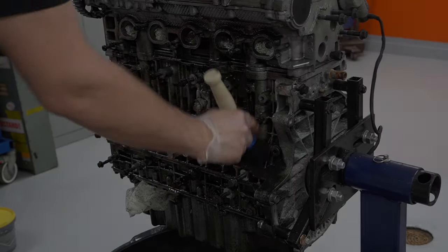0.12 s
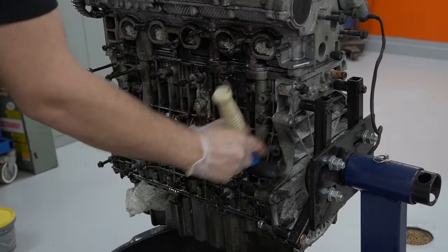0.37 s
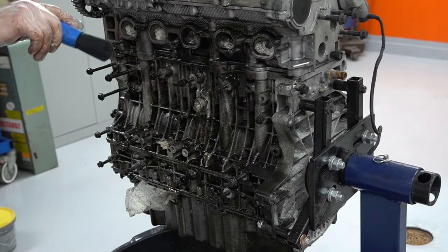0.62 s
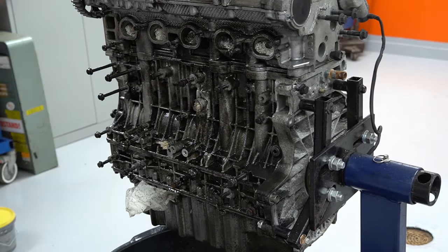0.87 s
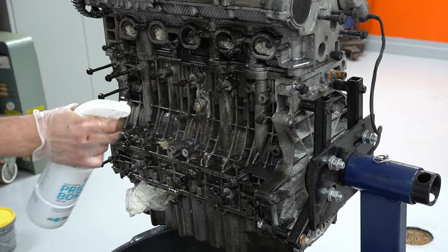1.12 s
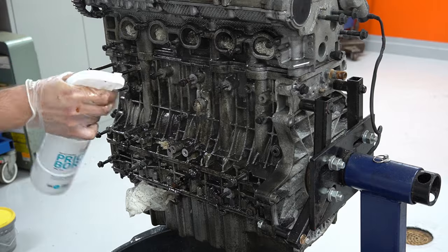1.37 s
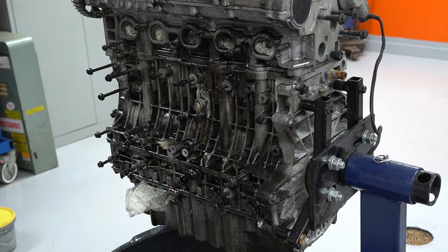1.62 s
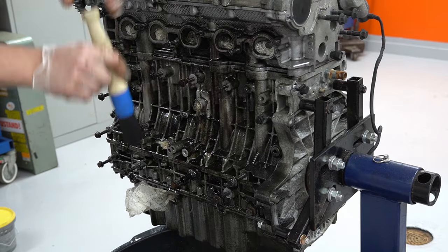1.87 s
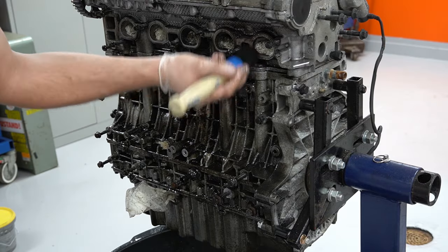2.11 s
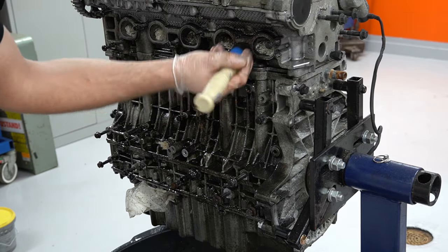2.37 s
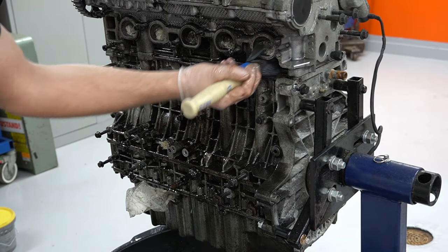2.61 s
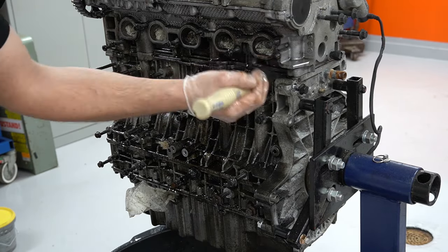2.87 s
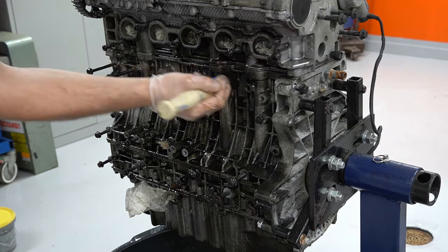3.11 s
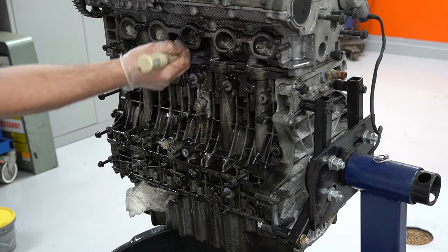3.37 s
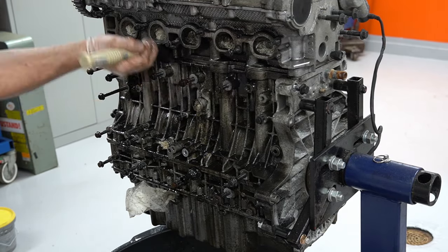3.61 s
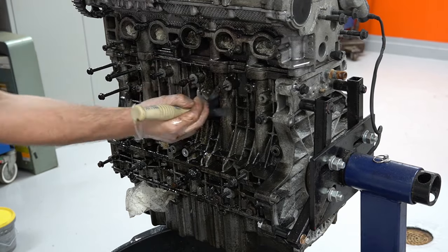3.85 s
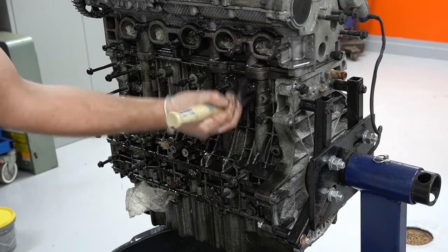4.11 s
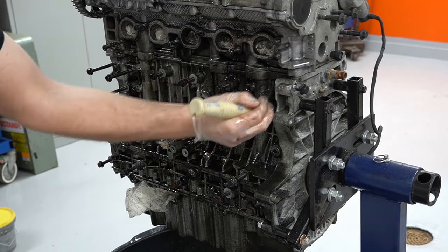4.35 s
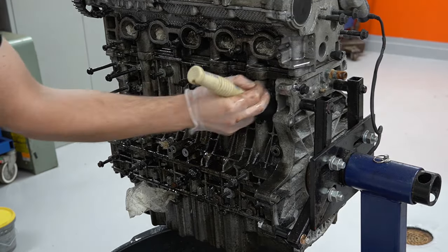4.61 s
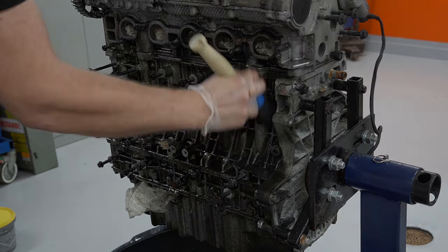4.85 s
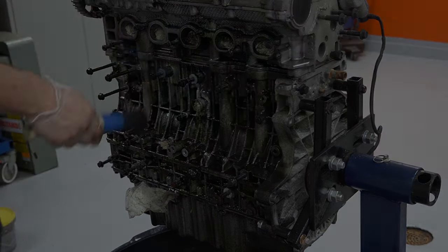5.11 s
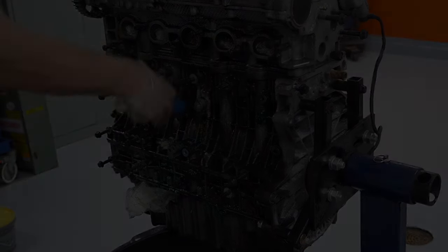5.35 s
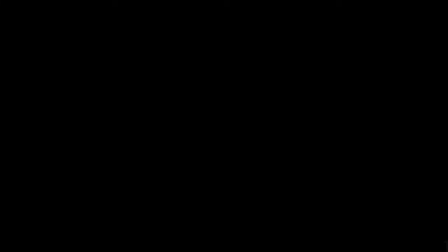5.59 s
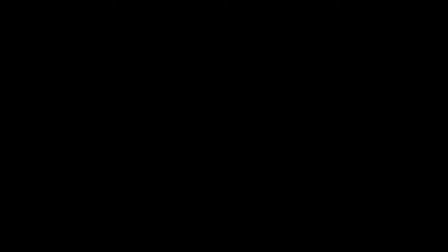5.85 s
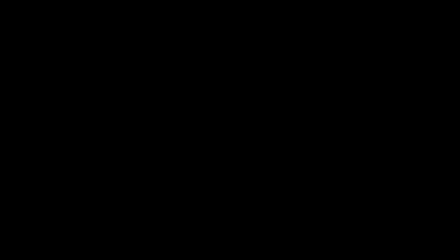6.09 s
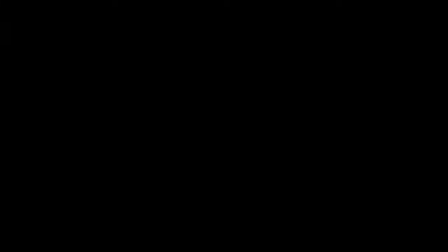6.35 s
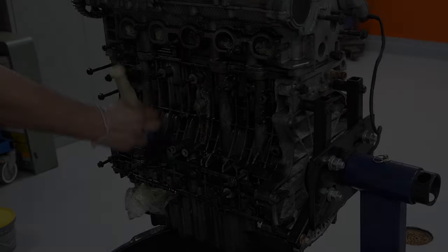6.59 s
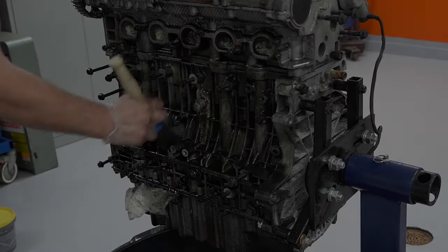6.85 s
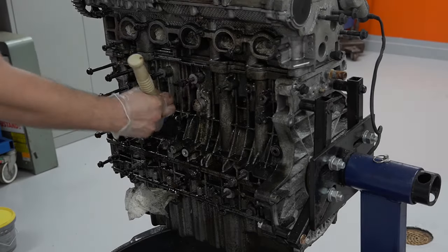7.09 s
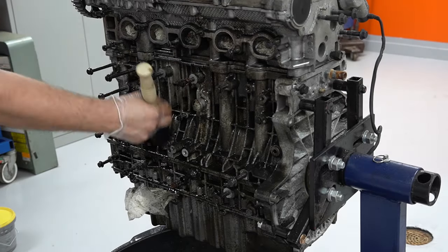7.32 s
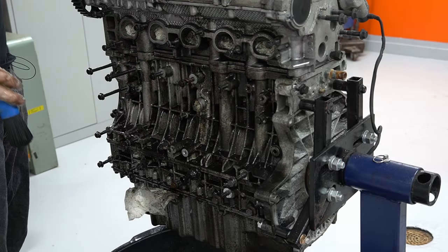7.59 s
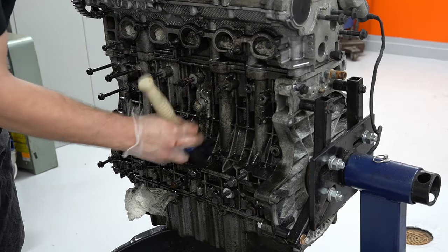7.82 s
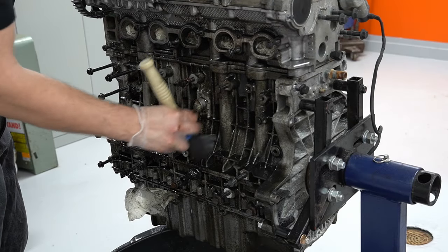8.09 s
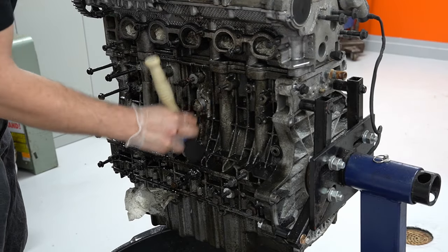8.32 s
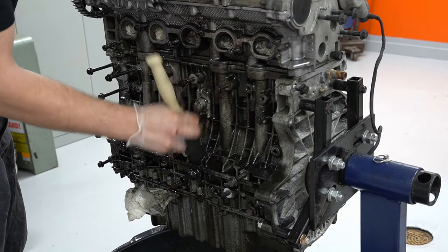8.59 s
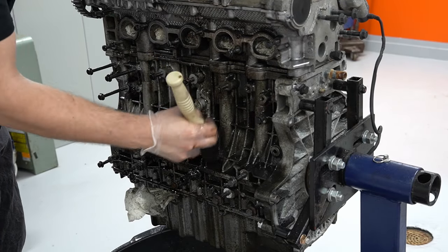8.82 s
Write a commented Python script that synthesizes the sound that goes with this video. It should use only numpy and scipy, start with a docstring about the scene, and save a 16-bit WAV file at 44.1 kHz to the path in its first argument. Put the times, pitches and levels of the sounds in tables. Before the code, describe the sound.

Close, dry scrubbing of bristles on cast metal, each stroke so quick that the bursts buzz like a rapid flutter. After a short opening bout comes a quiet pause with fast faint sprays and clicking trigger ticks, then long vigorous bouts whose colour shifts between bright hiss and hollow rasp. Small wooden-sounding knocks and soft glove rubs intrude, and deep bumps rumble through the microphone in a small-sounding garage with a faint low floor.

```python
"""A stiff brush scrubs a wet engine block in very quick strokes, heard at high speed: noise of random bristle
flicks on cast ribs (hiss) plus the same noise through a metal pocket (rasp), swelling with each stroke. Low
rumble comes in lumps of filtered noise through the microphone mount, over a faint garage floor. The handle
knocks now and then (decaying modes), glove and bottle rub and the brush scrapes a pocket edge (narrow noise),
and a trigger bottle sprays in a pause (noise jets, ringing ticks); knocks, rubs and bottle echo in the garage."""
import sys
import numpy as np
from scipy import signal
from scipy.io import wavfile
from scipy.ndimage import uniform_filter1d

SR = 44100
rng = np.random.default_rng(int(sys.argv[2]) if len(sys.argv) > 2 else 0)


def int16_out(signal):
    """Quantize to a 16-bit WAV file."""
    q = np.round(np.clip(np.atleast_2d(signal).T, -1, 1) * 32767)
    wavfile.write(sys.argv[1], SR, q.astype(np.int16))


def makeup_ratio(level_db):
    """Linear amplitude ratio for a level in decibels (20 dB per factor of ten)."""
    decades = np.asarray(level_db, float) / 20
    return 10 ** decades


N = 394694


def rms_one(x):
    """Scale to rms 1."""
    return x / np.sqrt(np.mean(x ** 2) + 1e-20)


def in_time(rows):
    """Interpolate the columns of (s, value, ..) rows at every sample."""
    time_s, *columns = np.transpose(rows)
    return [np.interp(np.arange(N) / SR, time_s, column) for column in columns]


def band(x, low_hz, high_hz):
    """Butterworth band-pass."""
    return signal.sosfilt(signal.butter(2, [low_hz, high_hz], "band", fs=SR, output="sos"), x)


def drift(rate_hz):
    """Slow random curve of rms 1: two-pole low-passed noise, drawn every 40 samples."""
    pole = np.exp(-80 * np.pi * rate_hz / SR)
    noise = rng.standard_normal(N // 40 + 2002)
    slow = signal.lfilter([1], [1, -2 * pole, pole * pole], noise)[2000:]   # settled part
    return np.interp(np.arange(N) / 40, np.arange(len(slow)), rms_one(slow))


def swells(middle_s, level_db, half_ms):
    """Power of bell-shaped swells: speed rises and falls within each movement."""
    power = np.zeros(N)
    for s, db, half_s in zip(middle_s, level_db, np.maximum(half_ms, 1) / 1000):
        start = max(round((s - 5 * half_s) * SR), 0)
        stop = min(round((s + 5 * half_s) * SR), N)
        at = np.arange(start, stop)
        late_s = at / SR - s
        width_s = half_s * (1 + 0.11 * np.sign(late_s))   # rise a little quicker than fall
        power[at] += makeup_ratio(2 * db) * np.exp(-0.5 * (late_s / width_s) ** 2)
    return power


def flicks(per_s, spread_db):
    """Random clicks of uneven size and either sign, rms 1."""
    sizes = makeup_ratio(spread_db * np.minimum(rng.exponential(1, N), 5)) * rng.choice([-1, 1], N)
    return rms_one(sizes * (rng.random(N) < per_s / SR))


def bands(spectrum, sources, patchy_db, rate_hz):
    """Centres and signals of third-octave bands; sources alternate, each band flickers on its own."""
    edges = 180 * 2 ** np.arange(0, 6.7, 1 / 3)
    centre_hz = np.sqrt(edges[1:] * edges[:-1])
    table_hz, table_db = np.transpose(spectrum)
    gains = makeup_ratio(np.interp(np.log(centre_hz), np.log(table_hz), table_db))
    parts = []
    for k, gain in enumerate(gains):
        flicker = makeup_ratio(patchy_db * drift(rate_hz))
        parts.append(gain * flicker * band(sources[k % 2], edges[k], edges[k + 1]))
    return centre_hz, np.array(parts)


def ring(clicks, hz, t60_s):
    """Two-pole resonator: a unit click starts a decaying sine of initial height 1."""
    pole, w = makeup_ratio(-60 / (t60_s * SR)), 2 * np.pi * hz / SR
    return signal.lfilter([0, np.sin(w)], [1, -2 * pole * np.cos(w), pole * pole], clicks + 1e-18)


def hand():
    """Scrubbing effort: bouts of strokes over a drag that runs from bout to bout, weaker as the brush lifts."""
    # bouts of evenly spaced strokes: first_middle_s, strokes, strokes_per_s
    bouts = [(0.02, 8, 30.6), (0.286, 6, 27.4), (0.495, 2, 29.1), (0.601, 3, 20.4), (0.864, 1, 30),
             (1.661, 3, 18.1), (1.859, 1, 30.0), (1.886, 2, 34.8), (2.013, 16, 31.0), (2.522, 11, 28.9),
             (2.911, 6, 29.5), (3.144, 5, 26.9), (3.353, 3, 31.8), (3.458, 2, 35.0), (3.526, 6, 28.0),
             (3.786, 4, 26.3), (3.957, 3, 28.9), (4.097, 5, 29.9), (4.295, 11, 29.7), (4.682, 8, 29.5),
             (4.986, 1, 30.0), (5.031, 1, 30.0), (5.126, 1, 30.0), (5.182, 1, 30.0), (5.223, 8, 29.6),
             (5.519, 3, 43.3), (5.621, 4, 28.8), (5.753, 7, 28.7), (5.981, 8, 26.8), (6.303, 2, 27.7),
             (6.393, 3, 29.0), (6.512, 10, 32.1), (6.835, 3, 27.0), (6.959, 10, 30.7), (7.295, 4, 27.7),
             (7.448, 2, 30.4), (7.559, 1, 30.0), (7.697, 2, 20.3), (7.802, 2, 20.1), (7.874, 12, 29.4),
             (8.325, 7, 28.8), (8.638, 5, 31.2), (8.801, 2, 43.8), (8.871, 3, 29.9)]
    # pressure in each bout: hiss_db, drag_over_hiss_db
    pressure = [(-42, -8.5), (-43, -7.5), (-40.5, -17), (-62, -4.0), (-62.5, -5), (-60.5, -6), (-46.5, -15),
                (-53, -5), (-39.0, -10.5), (-40.5, -4.5), (-40, -6.5), (-41.0, -5.5), (-43.5, -1.5),
                (-36, -11), (-41.0, -7), (-38, -8.5), (-47.0, 1), (-36.5, -11), (-39.0, -5.5),
                (-41.5, -5.5), (-40, -5.5), (-51, -10), (-55.5, 1), (-48.5, -6), (-38, -12.5),
                (-44.5, -0.5), (-38, -5.0), (-42.0, -6.0), (-44, -2.5), (-52, -5.5), (-50, -0.5),
                (-44.5, -6), (-41.5, -6.5), (-42.5, -8), (-44, -4), (-55, -6.5), (-50.5, -12), (-56.5, -6),
                (-42.0, -7), (-45.5, -5.5), (-45, 0.0), (-43.0, -4.5), (-44.5, -13), (-42.0, -9.5)]
    # strokes off the beat, or harder or softer than their bout: middle_s, change_db
    accents = [(0.023, 2.5), (0.089, -5.5), (0.125, -5.5), (0.154, -6), (0.322, 5), (0.396, 1.5),
               (0.429, -1.5), (0.53, -3.5), (1.778, -9), (1.989, -8), (2.042, -5.5), (2.107, -5),
               (2.172, -2.5), (2.266, 0.5), (2.339, -7), (2.37, 1.5), (2.405, 0), (2.525, 9.5), (2.556, 2),
               (2.623, 7), (2.66, 5.5), (2.728, -1), (2.797, 3.5), (2.949, -5.5), (3.047, 1), (3.186, -6),
               (3.253, 6), (3.289, 4.5), (3.527, -4), (4.026, 8.0), (4.093, -2.5), (4.128, 3.5),
               (4.403, 0.5), (4.457, 2.5), (4.501, 5), (4.569, 0.5), (4.604, 0), (4.788, -2), (4.892, 1),
               (5.395, 8.5), (5.435, 1), (5.549, -7), (5.817, -0.5), (5.865, 1), (5.89, 4), (6.198, 4),
               (6.429, 7.5), (6.66, 1), (6.691, -1.5), (6.728, 3.5), (6.881, -11), (6.991, 1.5),
               (7.057, -8.5), (7.187, -3), (7.221, -13), (7.339, 4.5), (7.877, 4.5), (7.975, 4), (8.006, 0),
               (8.211, 0), (8.247, 5), (8.47, 6.5), (8.53, -16), (8.703, -9), (8.766, 5.5), (8.938, 2.5)]
    # brush leaves the metal, drag weakens: middle_s, depth_db, half_ms
    lifts = [(0.802, 19, 25), (0.91, 18, 20), (1.794, 5, 35.0), (1.945, 18.0, 14.0), (2.876, 6, 12.5),
             (3.2, 7.5, 20), (3.752, 12, 10.6), (3.918, 17, 10), (4.068, 1, 3.2), (4.261, 4.5, 9.6),
             (4.356, 15, 10), (5.066, 4, 20.0), (5.14, 7, 11), (5.504, 13.5, 10), (5.851, 2, 4.5),
             (6.285, 2.5, 11.5), (7.437, 16, 11), (7.545, 18, 8.5), (7.663, 19, 25), (7.778, 12, 5.0),
             (8.857, 4, 6.0)]
    stroke_half_ms, shorter_per_db, stroke_spread_db = 5.53, 0.0318, 0.1   # shorter: exponent per dB
    strokes, drag = [], []
    for (first_s, count, per_s), (level_db, over_db) in zip(bouts, pressure):
        times_s = first_s + np.arange(count) / per_s
        strokes += [(s, level_db) for s in times_s]
        drag += [(times_s[0], level_db + over_db), (times_s[-1] + 0.001, level_db + over_db)]
    stroke_s, level_db = np.transpose(strokes)
    change_db = stroke_spread_db * rng.standard_normal(len(stroke_s))
    accent_s, accent_db = np.transpose(accents)
    nearest = np.argmin(np.abs(stroke_s - accent_s[:, None]), axis=1)
    stroke_s[nearest], change_db[nearest] = accent_s, accent_db
    drag_db, = in_time(sorted(drag))
    for middle_s, depth_db, half_ms in lifts:
        lift = np.minimum(2 * swells([middle_s], [0], np.array([half_ms])), 1)   # flat-topped
        drag_db = drag_db - depth_db * lift
    half_ms = stroke_half_ms * np.exp(-shorter_per_db * change_db)   # a harder stroke is a quicker one
    return np.sqrt(swells(stroke_s, level_db + change_db, half_ms) + makeup_ratio(2 * drag_db))


def brush():
    """Dense bristle flicks swell with every stroke; the pocket under the brush rings and hollows the colour."""
    # where the brush works: time_s, rasp_over_hiss_db, pocket_hz, hollow_db (at 2.8-5.6 kHz)
    place = [(0.0, -2.5, 1400, 0), (0.4, -10, 970, -4), (0.6, -3.5, 1450, 0), (0.8, 6, 1500, 8),
             (1.2, 6.5, 1410, 4), (1.6, 7, 1310, 8), (1.8, -3, 1440, -2), (2.0, -7, 1810, -3),
             (2.3, -9, 1840, -2), (2.6, -5.5, 1780, -4), (2.95, -4.5, 1720, -2), (3.4, -5, 1650, -3),
             (4.1, -5, 1950, -1), (4.35, -4, 1720, -3), (4.65, -2, 1590, -4.5), (4.97, 0, 1500, -7),
             (5.08, -1.5, 1500, 4.5), (5.3, -6.5, 1450, -1.5), (5.6, -2, 1730, 0.5), (5.9, -4.5, 1750, -3),
             (6.4, 0, 1490, 2), (6.6, -5.5, 1480, -2.5), (7.0, -5.5, 1720, -2), (7.4, -6, 1420, -1),
             (7.6, 6, 1840, 8.5), (7.8, -6.5, 1500, -2), (8.3, -3, 1560, 2), (9.0, -6.5, 1850, -4)]
    # scrub spectrum: freq_hz, density_db (per Hz, relative)
    scrub_spectrum = [(180, -63), (300, -13), (554, -3), (838, -0.5), (957, -2), (1470, -3.5), (2260, -2),
                      (3850, -5.5), (7980, -8), (13600, -10), (15700, -17)]
    rasp_db, pocket_hz, hollow_db = in_time(place)
    effort = hand()
    hz, parts = bands(scrub_spectrum, [flicks(14000, 3.8), flicks(14000, 3.0)], patchy_db=2.0, rate_hz=30.5)
    parts[(hz > 2800) & (hz < 5600)] *= makeup_ratio(hollow_db)
    parts[hz > 9500] *= makeup_ratio(0.25 * hollow_db)   # a pocket also shades the finest tips
    parts[(hz > 5600) & (hz < 9500)] *= makeup_ratio(-0.25 * hollow_db)   # and brightens above its hollow
    low = hz < 2800
    depth_db = np.clip(11 + 1.2 * rasp_db, 2, 14)   # a deep pocket rasps louder and rings more
    octaves = np.log2(hz[low, None] / pocket_hz)
    pocket = makeup_ratio(depth_db * np.exp(-0.5 * (octaves / 0.45) ** 2))
    loudness = np.sqrt(np.mean(parts[low] ** 2, axis=1) @ pocket ** 2)
    rasp = makeup_ratio(rasp_db) * (pocket * parts[low]).sum(0) / loudness
    hiss = rms_one(parts[~low].sum(0))
    return effort * (hiss + rasp), effort


def garage_floor():
    """Faint steady garage noise: white noise in slowly flickering bands."""
    # floor spectrum: freq_hz, density_db (per Hz, relative)
    floor_spectrum = [(88, -31), (150, -3.5), (553, -7), (1100, -9), (1960, -19), (2380, -7.5),
                      (3190, -16.5), (12900, -29), (15700, -40)]
    parts = bands(floor_spectrum, rng.standard_normal((2, N)), patchy_db=3, rate_hz=1.7)[1]
    return makeup_ratio(-62) * rms_one(parts.sum(0))


def mount(effort):
    """Low shaking follows the scrubbing; lumps of rumble; short pushes on the diaphragm that ring the mount."""
    # lumps of mount rumble: middle_s, low_db, half_ms, upper_over_low_db
    lumps = [(0.609, -47.5, 8.5, -8.5), (0.74, -52.5, 4.3, -8), (0.852, -43, 4, -32),
             (0.925, -53, 3.6, -17), (1.765, -48, 8.5, 1), (1.79, -59, 12, -7), (1.845, -49.5, 9, -6),
             (2.468, -56, 3.6, -20), (2.61, -46.5, 6.5, -11), (2.662, -47, 9.2, -25), (3.119, -51, 31, -7),
             (3.276, -43.5, 9, -9), (3.38, -53, 41, 0.5), (3.588, -50, 25, -9.5), (4.262, -44, 2.6, -4),
             (5.029, -43, 7.8, -9.5), (5.195, -38, 8, -19), (5.248, -43, 5, -30), (5.287, -46, 6, -25.5),
             (5.421, -26, 4.7, -34), (5.454, -28, 6.8, -26), (5.495, -45, 8.9, -25), (5.643, -25, 4.5, -28),
             (5.68, -30.5, 13, -23), (5.73, -33.5, 6.8, -13), (5.875, -26, 3.9, -12),
             (5.924, -27.5, 19.5, -18.5), (6.024, -44, 9.6, -7), (6.116, -32, 9.8, -10),
             (6.167, -29.5, 16, -24), (6.352, -27, 11, -29), (7.446, -36.5, 4.9, -25),
             (7.563, -39, 5.8, -11), (7.616, -36, 8.7, -34), (7.711, -45, 5.6, -5.5), (8.296, -47, 5.3, 0)]
    # bumps of the microphone mount: start_s, push_db (before band-pass), length_ms
    bumps = [(1.754, -26.5, 4.3), (5.03, -26, 1.56), (6.124, -19.5, 2.9), (6.16, -19, 4.3),
             (7.44, -25, 1.47)]
    mount_hz, mount_t60_s, mount_ring_db = 189.3, 0.1, -45
    middle_s, low_db, half_ms, upper_db = np.transpose(lumps)
    white = rng.standard_normal((3, N))
    sway = band(white[0], 30.3, 89)
    sway /= np.sqrt(uniform_filter1d(sway ** 2, size=900))   # an even, wandering swing
    rumble = sway * np.sqrt(swells(middle_s, low_db, half_ms))
    upper = rms_one(band(white[1], 64, 506))
    rumble += upper * np.sqrt(swells(middle_s, low_db + upper_db, half_ms))
    shake_level = makeup_ratio(-18.0) * uniform_filter1d(effort, size=6000) + makeup_ratio(-60.5)
    shake = band(white[2], 3.9, 100.4) + 0.35 * band(white[2], 62, 316)
    shake = shake_level * rms_one(makeup_ratio(4.45 * drift(25.0)) * shake)
    pushes = np.zeros(N)
    for start_s, push_db, length_ms in bumps:
        push = np.hanning(max(round(length_ms * SR / 1000), 4))
        pushes[round(start_s * SR):][:len(push)] -= makeup_ratio(push_db) * push
    ringing = makeup_ratio(mount_ring_db) * ring(pushes, mount_hz, mount_t60_s)
    return rumble + shake + band(pushes, 94, 3000) + ringing


def knocks():
    """Each handle knock on the block strikes all modes, those near its own pitch hardest."""
    # handle knocks: start_s, strike_db (before mode levels), best_excited_hz
    hits = [(0.2387, -24, 1160), (0.2708, -26.5, 720), (.389, -42.5, 910), (2.522, -34, 3120),
            (3.069, -42.5, 1130), (3.135, -28, 2420), (3.25, -33, 4450), (4.393, -34, 2160),
            (5.252, -45, 1330), (5.3974, -19, 3720), (5.3982, -28, 1470), (7.975, -39, 1600)]
    # modes of handle and casting: mode_hz, level_db (relative), t60_s
    modes = [(407, 10, 0.041), (674, 2.5, 0.029), (826, 7.5, 0.019), (1170, 5, 0.013), (1440, -1.5, 0.028),
             (1950, -12, 0.022), (2130, -13, 0.027), (3260, -25, 0.0088), (3660, 2, 0.013),
             (5200, -23, .008), (7460, -14, 0.0055)]
    start_s, strike_db, best_hz = np.transpose(hits)
    chance_db = rng.normal(0, 2, (len(start_s), len(modes)))
    out = np.zeros(N)
    for k, (hz, level_db, t60_s) in enumerate(modes):
        detune_db = -12 * np.abs(np.log2(hz / best_hz))   # 12 dB less per octave away
        clicks = np.zeros(N)
        clicks[np.round(start_s * SR).astype(int)] = -makeup_ratio(strike_db + level_db + detune_db + chance_db[:, k])
        out += ring(clicks, hz, t60_s)
    return band(out, 450, 14000)   # a small handle radiates no bass


def garage(x):
    """Room echo: six feedback delays, duller on every round."""
    t60_s, wall_cut_hz = 0.083, 6500
    dull = np.exp(-2 * np.pi * wall_cut_hz / SR)
    out = np.zeros(N)
    lags = (rng.uniform(0.0053, 0.021, size=6) * SR).astype(int)
    for k, lag in enumerate(lags):
        loop, state = x.copy(), [0.]
        gain = makeup_ratio(-60 * lag / SR / t60_s)
        for i in range(lag, N, lag):
            back, state = signal.lfilter([gain * (1 - dull)], [1, -dull], loop[i - lag:i], zi=state)
            loop[i:i + lag] += back[:N - i]
        out += (loop - x) * (-1) ** k
    return out


def rubs():
    """Short soft rubs of glove and bottle, and hard scrapes of the brush over a pocket edge, each noise in one
    hollow resonance."""
    # hollow rubs and pocket-edge scrapes: middle_s, level_db, half_ms, pitch_hz
    touches = [(.36, -43, 3.1, 900), (0.779, -45, 3.3, 1560), (.96, -42.5, 5.4, 1320),
               (1.6, -50.5, 7.4, 820), (2.622, -35.5, 2.7, 2130), (2.976, -42.5, 3.2, 1440),
               (4.398, -33, 1.9, 1850), (7.568, -49.5, 9.8, 1950), (7.579, -54, 15, 3150),
               (7.712, -44, 2.2, 1440)]
    out = np.zeros(N)
    for middle_s, level_db, half_ms, hz in touches:
        near = slice(round((middle_s - 0.1) * SR), round((middle_s + 0.1) * SR))
        wide = 1 + 0.7 / half_ms   # longer rubs ring more purely
        noise = rms_one(band(rng.standard_normal(near.stop - near.start), hz / wide, hz * wide))
        out[near] += noise * np.sqrt(swells([middle_s], [level_db], np.array([half_ms]))[near])
    return out


def bottle():
    """Smooth noise jets from the nozzle and short ringing plastic ticks of the trigger."""
    # squirts of the bottle: middle_s, level_db
    squirts = [(0.955, -52), (1.004, -53), (1.044, -65), (1.088, -55.5), (1.131, -51), (1.168, -49.5),
               (1.204, -51), (1.246, -47), (1.283, -49), (1.322, -46.5), (1.366, -49.5), (1.409, -48.5),
               (1.443, -49.5), (1.484, -49), (1.517, -49.5), (1.551, -48), (1.601, -47.5)]
    # trigger ticks: start_s, strike_db (before the rings are summed)
    trigger = [(0.8704, -51), (1.002, -44), (1.042, -49), (1.1308, -36.5), (1.1828, -43), (1.2335, -43),
               (1.243, -35), (1.3024, -52), (1.3727, -41), (1.4406, -35.5), (1.508, -47), (1.533, -42),
               (1.5836, -44)]
    jet = signal.lfilter([1], [1, -0.4], band(rng.standard_normal(N), 380, 15500))
    middle_s, level_db = np.transpose(squirts)
    spray = rms_one(jet) * np.sqrt(swells(middle_s, level_db, np.full(len(squirts), 5.2)))
    clicks = np.zeros(N)
    for start_s, strike_db in trigger:
        clicks[round(start_s * SR)] = makeup_ratio(strike_db)
    ticks = ring(clicks, 2900, 0.012) - 0.5 * ring(clicks, 1600, 0.012) - 0.6 * ring(clicks, 4300, 0.009)
    return spray + ticks


def scene():
    """Sum of all sources; knocks, rubs and bottle also echo in the garage."""
    scrub, effort = brush()
    hard = knocks() + rubs() + bottle()
    near = scrub + hard + mount(effort)
    echo = makeup_ratio(-13) * garage(hard)
    return (near + echo + garage_floor())[None]


def low_pass(x):
    """Removes everything above the highest recorded frequency."""
    return signal.sosfilt(signal.butter(12, 15880, fs=SR, output="sos"), x)


def record(dry):
    """The finished mix as stored."""
    return low_pass(dry)


dry = scene()
out = record(dry)
int16_out(out)
```